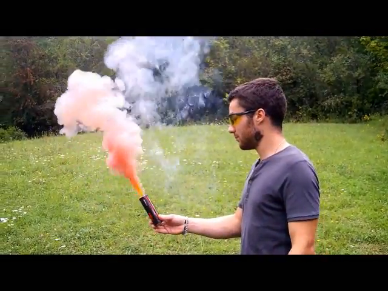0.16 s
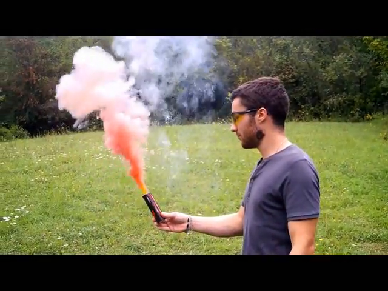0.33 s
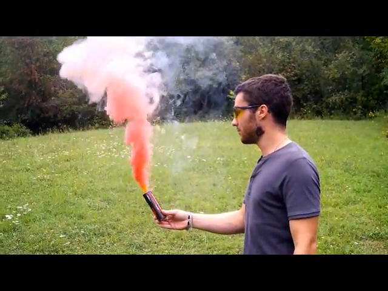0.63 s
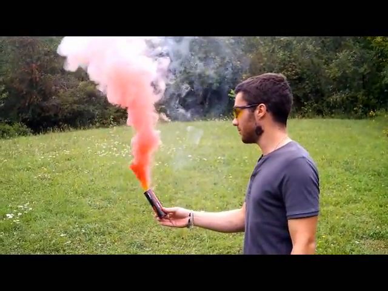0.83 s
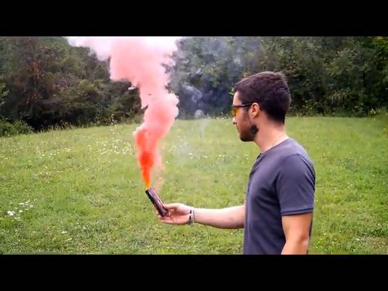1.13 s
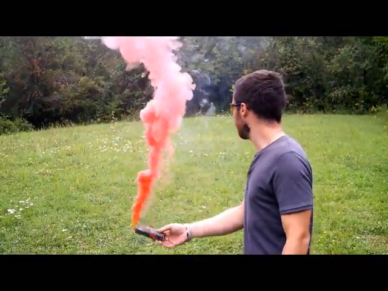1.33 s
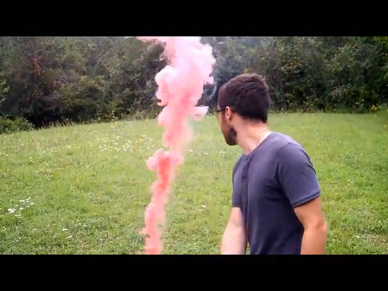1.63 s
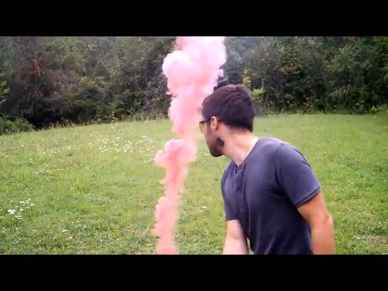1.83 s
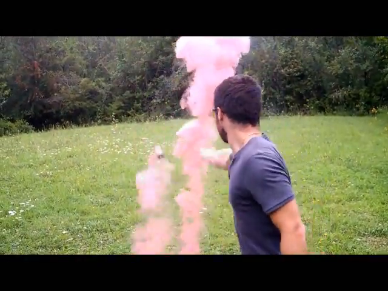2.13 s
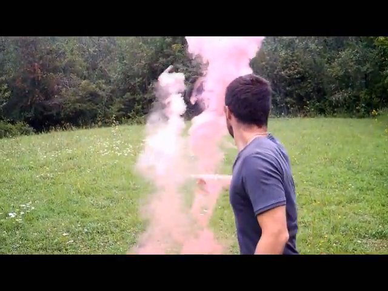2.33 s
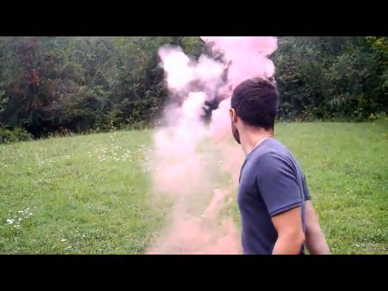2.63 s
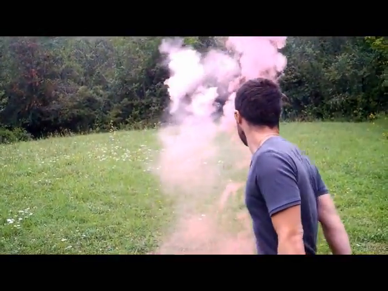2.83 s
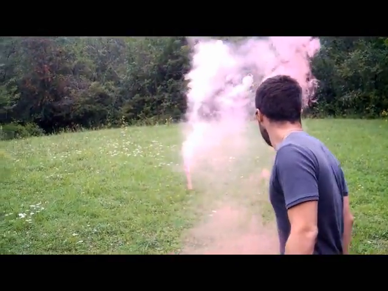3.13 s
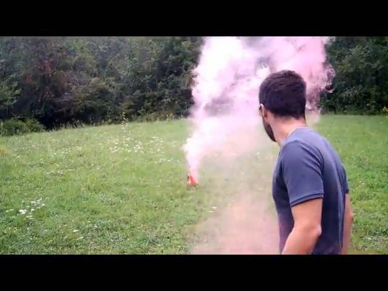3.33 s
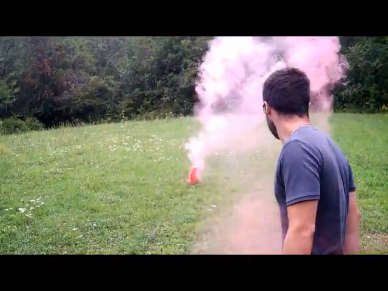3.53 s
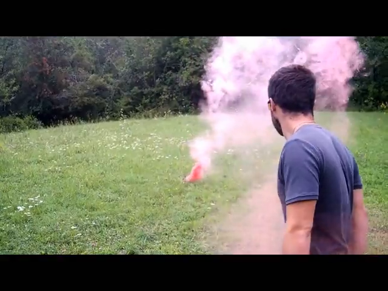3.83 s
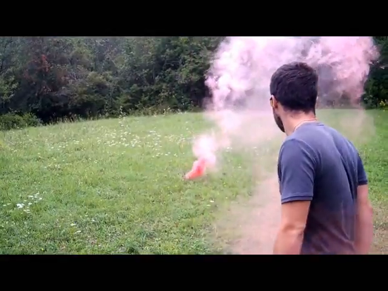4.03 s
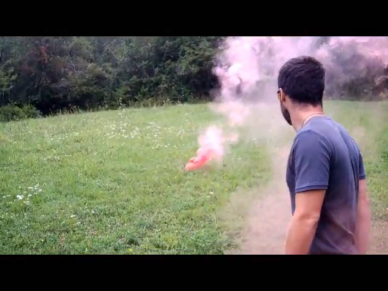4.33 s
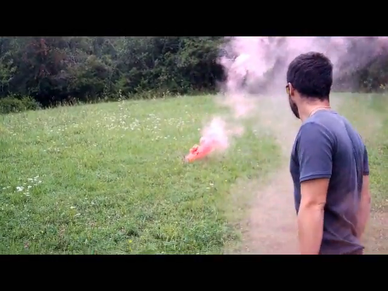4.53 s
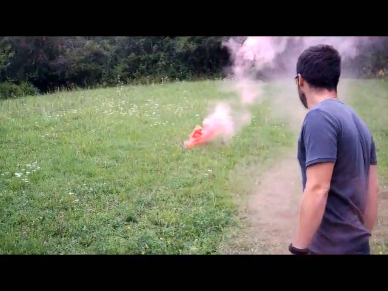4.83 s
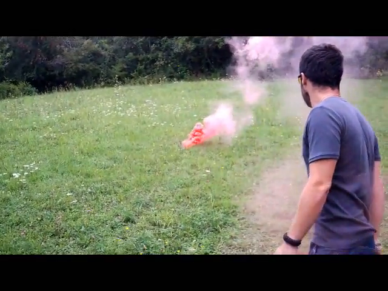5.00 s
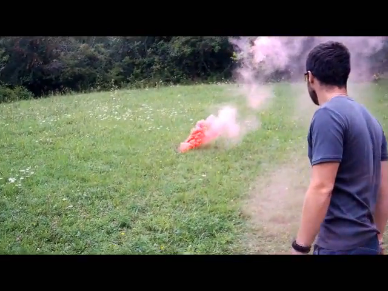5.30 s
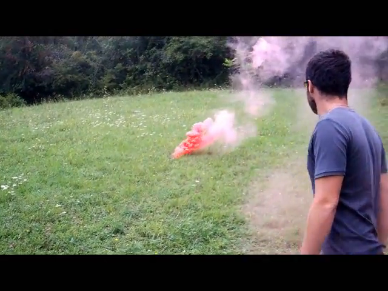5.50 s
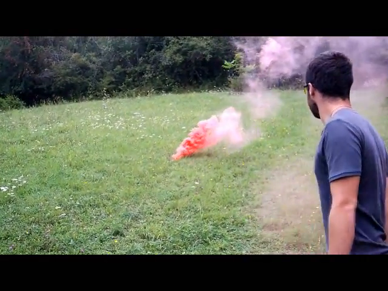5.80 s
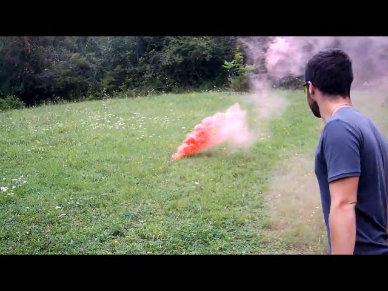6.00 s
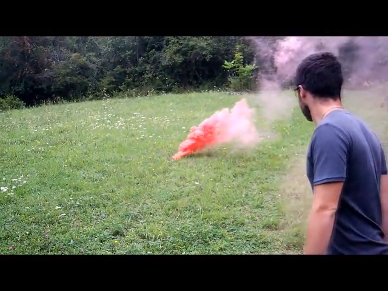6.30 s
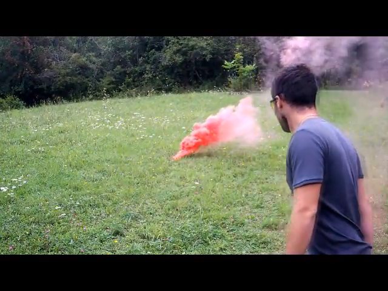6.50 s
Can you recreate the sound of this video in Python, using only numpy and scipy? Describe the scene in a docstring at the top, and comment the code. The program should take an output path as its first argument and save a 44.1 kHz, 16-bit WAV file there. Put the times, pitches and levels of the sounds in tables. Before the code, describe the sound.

A smoke grenade burns with a soft rush over the steady, quiet wash of an open field. Right at the hand-held microphone come irregular, short pops and hollow knocks, like taps on the housing. At 0.9 seconds one very loud, sharp crack clips and jolts the microphone. Smaller knocks cluster around 1.3 seconds, with more at 1.8, 2.1 and 2.6. The rush brightens near 1.9 seconds as the grenade is swung, spits faintly as it is thrown, then recedes. A grainy hiss swells at about 3.3 seconds and more softly at 4.2, among further pops between 3.2 and 4 seconds. Low gusts buffet the microphone from about 3.2 to 5.6 seconds, with a sharp click at 4.8. The hiss rises again from 5.2 to 5.7 seconds with light knocks and ticks. A firmer knock and low bump land at 5.9, leaving the quiet field and a faint hiss.

```python
"""A soft rush over the quiet wash of an open field: a smoke grenade burning, heard from a hand-held camera.
Right at the microphone come irregular pops and sharp cracks, most likely knocks on the camera's housing;
all ring the same few modes, and the hardest one clips. Out in the field a grainy hiss comes
and goes in a few swells. Gusts and the hardest knocks shake the microphone."""
import sys
import numpy as np
from scipy import signal
from scipy.fft import rfft, irfft, next_fast_len
from scipy.io import wavfile
from scipy.ndimage import uniform_filter1d

SR = 44100
rng = np.random.default_rng(int(sys.argv[2]) if len(sys.argv) > 2 else 0)


def put_to_file(sound):
    """Save the sound as 16-bit audio at rate SR, in the file named by the first command-line argument."""
    columns = np.atleast_2d(sound).T  # one column per channel
    safe = np.clip(columns, -1, 1)
    whole_steps = np.round(safe * 32767)
    wavfile.write(sys.argv[1], SR, whole_steps.astype(np.int16))


N = 293392
TIME = np.arange(N) / SR

# knocks on the housing: t/s, relative levels of ring/dB, thump/dB, crack/dB, crack tilt/(dB per octave)
KNOCK_HITS = [(0.672, -36.5, -43, -57.5, -3), (0.9177, -4, -21, -1, -1.5), (1.243, -33.5, -38.5, -50, -5),
              (1.289, -30.5, -31.5, -41, -8), (1.327, -19.5, -34, -28, -6), (1.792, -21, -33, -22.5, 3),
              (1.897, -41, -43, -60, -3), (2.101, -25, -36.5, -41.5, -6.5), (2.299, -31, -40.5, -54, 4),
              (2.592, -18.5, -34, -22.5, -4), (3.21, -33, -41, -52, -6), (3.465, -23, -33, -37, -4),
              (3.585, -23.5, -34, -39, -2.5), (3.754, -32, -45.5, -63, -1), (3.89, -21, -42.5, -24.5, -2.5),
              (4.025, -27.5, -50, -37.5, -13.5), (4.7652, -35, -59, -24.5, 4.5),
              (5.136, -33, -37.5, -49.5, 7.5), (5.229, -28, -36.5, -57.5, 5), (5.319, -27, -37, -42.5, 2.5),
              (5.574, -40.5, -43.5, -49, -5), (5.881, -21.5, -25, -27.5, -7),
              (5.893, -27.5, -42.5, -38.5, -3.5), (5.952, -40.5, -46.5, -58, 6.5)]
# modes of the housing, low to high: f/Hz, level/dB, t60/s
HOUSING_MODES = [(169.04, -2, 0.1526), (179, -29, .06), (363.8, -3, 0.0455), (424.5, 2.5, 0.0327),
                 (534, -4.5, 0.0743), (587.1, 11, 0.01803), (712.65, 1.5, 0.0574), (756.4, -9, 0.0476),
                 (924.6, 1.5, 0.02635), (1103.4, -9, 0.05), (1355.5, -0.5, 0.0287), (1584.7, -2.5, 0.0463),
                 (1791.5, 4.5, 0.0157), (2260, -8, 0.011), (2749, -1.5, 0.0243), (3356, 5, 0.0096),
                 (3842, 4, 0.015), (4224, -4, 0.0132), (4903, -6, 0.0104), (5837, 0.5, 0.0155),
                 (6674, 2, 0.0098), (8564, -11, 0.014)]
# spectrum of surfaces scraping in a knock: f/Hz, level/dB
SCRAPE_SPECTRUM = [(300, -8), (700, -30), (950, -0.5), (1400, -36.5), (1900, 5.5), (2650, 5), (3100, -21.5),
                   (4100, 14.5), (5700, 7), (7000, -8), (9000, -5.5)]
# spectrum of the grenade's hiss and spitting: f/Hz, level/dB
HISS_SPECTRUM = [(1200, -21.5), (2200, -9), (2900, -2), (4200, -2), (6500, 0.5), (8500, 2.5), (9600, -3.5)]


def gain_of(db):
    """Decibels to amplitude."""
    return 10 ** (np.asarray(db) / 20)


def unit_rms(x):
    """Scales to rms 1."""
    return x / np.sqrt(np.mean(x ** 2) + 1e-20)


def unit_hit(x):
    """Scales a hit so that its loudest 5 ms have rms 1."""
    return x / np.sqrt(uniform_filter1d(x ** 2, 220).max() + 1e-20)


def add(mix, s, sound):
    """Mixes a sound in at time s."""
    part = mix[round(s * SR):][:len(sound)]
    part += sound[:len(part)]


def coloured(x, spectrum):
    """Filters x by a curve of (f/Hz, level/dB) points, to rms 1."""
    hz, db = np.transpose(spectrum)
    size = next_fast_len(2 * len(x), True)
    bins = np.fft.rfftfreq(size, 1 / SR)
    gain = gain_of(np.interp(np.log(bins + 1), np.log(hz + 1), db))
    return unit_rms(irfft(rfft(x, size) * gain, size)[:len(x)])


def noise(spectrum, size=N):
    """Noise of rms 1 with a spectrum of (f/Hz, level/dB) points."""
    return coloured(rng.standard_normal(size), spectrum)


def wander(rate_hz):
    """Slow random drift of rms 1, up to about the given rate."""
    bins = np.fft.rfftfreq(N, 1 / SR)
    return unit_rms(irfft(rfft(rng.standard_normal(N)) * np.exp(-(bins / rate_hz) ** 2), N))


def swell(s, rise, fall, db, shape=1.084):
    """A gain that peaks at time s and dies away; shape 1 is pointed, 2 round."""
    away = np.maximum((s - TIME) / rise, (TIME - s) / fall)
    return gain_of(db) * np.exp(-np.minimum(away, 20) ** shape)


def swelling(rows):
    """Overlapping swells add in power."""
    return np.sqrt(sum(swell(*row) ** 2 for row in rows))


def ringing(modes, t, detune=0.0322, damping_spread=0.046):
    """Dying sines; the grip shifts and damps each mode a little differently from blow to blow."""
    out = np.zeros(len(t))
    for hz, db, t60 in modes:
        shift, damping = rng.uniform(-1.008, 1, 2)
        decay = gain_of(db - 60 * t / t60 * np.exp(damping_spread * damping))
        out += decay * np.sin(2 * np.pi * hz * (1 + detune * shift) * t)
    return out


def chatter(t, length_s):
    """Surfaces rattle against each other for a few milliseconds, then hold."""
    return rng.standard_normal(len(t)) * (1 - np.exp(-t / 0.000126)) * np.exp(-(t / length_s) ** 2)


def stiff_shell(x, hz):
    """A stiff shell hardly follows a push slower than its modes: a high-pass, scaled to a unit hit."""
    return unit_hit(signal.sosfilt(signal.butter(2, hz, "highpass", fs=SR, output="sos"), x))


def field(wash_db=-49, insects_db=-65):
    """The steady wash of open ground, with a thin high band like far insects."""
    # outdoor background: f/Hz, level/dB
    wash_spectrum = [(44, -29.5), (75, 1.5), (108, -1.5), (135, 0), (218, -7.5), (450, -9), (760, -12.5),
                     (1070, -10.5), (1570, -17.5), (2080, -18.5), (2550, -20), (2870, -20), (5150, -22.5),
                     (9240, -23), (12000, -54), (20300, -120)]
    wash = noise(wash_spectrum) * gain_of(wash_db + 0.31 * wander(7.1))
    insects = noise([(7600, -33), (8400, -5), (8680, -2.0), (9000, -2.5), (9600, -15)])
    return wash + gain_of(insects_db) * insects


def wind(breeze_db=-46, lumpy_db=1.5, jolt_db=-27, hardest_thump_db=-21):
    """Lumpy low buffeting at the microphone: a breeze, gusts, and a jolt from each hard knock."""
    # rumble at the microphone: f/Hz, level/dB
    rumble_spectrum = [(8, -24), (16, 4.5), (36, 1), (55, -5.5), (85, -16), (125, -31.5), (250, -35.5),
                       (600, -88.5)]
    # gusts: peak t/s, half length/s, level/dB
    gust_peaks = [(3.243, 0.131, -40.5), (3.652, 0.095, -35.5), (3.889, 0.063, -31), (4.508, 0.101, -32.5),
                  (4.67, .05, -38), (4.87, 0.073, -34), (5.566, 0.057, -36)]
    gusts = swelling([(s, half, half, db) for s, half, db in gust_peaks])
    jolts = swelling([(s, 0.0098, 0.075, jolt_db + 1.7 * (thump_db - hardest_thump_db))
                      for s, _, thump_db, *_ in KNOCK_HITS])
    strength = np.sqrt(gain_of(breeze_db) ** 2 + gusts ** 2 + jolts ** 2)
    return noise(rumble_spectrum) * strength * gain_of(lumpy_db * wander(5.07))


def burn(flutter_db=1.47, jet_flutter_db=0.27, spits_per_s=45):
    """Smoke rushes softly from the canister, brighter as it is swung, spitting as it is thrown."""
    # rush of the smoke: f/Hz, level/dB
    rush_spectrum = [(200, -11.5), (500, 1), (1150, 3), (1600, -3), (2200, -1), (3200, -4.5), (4200, -8.5),
                     (7000, -35.5)]
    # the rush at the microphone, fainter once thrown: t/s, level/dB
    rush_curve = [(0, -55), (1.6, -56), (2.0, -51.5), (2.7, -60.5), (6.65, -69.5)]
    # brighter jet of the swing: f/Hz, level/dB
    jet_spectrum = [(1500, -18), (2400, -4), (3100, 1.5), (3500, -2), (4300, -15), (7000, -35)]
    swing = swell(1.88, rise=0.24, fall=0.17, db=-54)
    throw = swell(2.5, rise=0.43, fall=0.01, db=-59)
    rush_db = np.interp(TIME, *np.transpose(rush_curve))
    rush = noise(rush_spectrum) * gain_of(rush_db + flutter_db * wander(8.1))
    jet = noise(jet_spectrum) * swing * gain_of(jet_flutter_db * wander(8))
    sparks = rng.uniform(-1, 1, N) * (rng.random(N) < spits_per_s / SR)
    spit = chatter(np.arange(SR // 100) / SR, 0.0028)
    sputter = coloured(signal.fftconvolve(sparks, spit)[:N], HISS_SPECTRUM) * throw
    return rush + jet + sputter


def hiss(flutter_db=1.3, grains_per_s=1200, grain_share=0.787):
    """Smooth hiss mixed with fine grains, swelling together."""
    # swells of the hiss: peak t/s, rise/s, fall/s, level/dB
    hiss_swells = [(2.38, 0.31, 0.085, -58), (3.08, 0.17, .1, -53.5), (3.27, 0.104, 0.101, -46),
                   (3.322, 0.0128, 0.0234, -39.5), (4.15, 0.06, 0.283, -49), (5.335, .085, .18, -42),
                   (5.67, .1, .045, -40.2), (5.96, 0.021, 0.052, -55), (6.65, 0.065, .05, -52)]
    grains = rng.standard_normal(N) * (rng.random(N) < grains_per_s / SR)
    fizz = coloured(rng.standard_normal(N) + grain_share * unit_rms(grains), HISS_SPECTRUM)
    return fizz * swelling(hiss_swells) * gain_of(flutter_db * wander(50))


def ticks():
    """Tiny bright contacts with no ring."""
    # dry ticks: t/s, level/dB
    tick_hits = [(0.9128, -20.5), (1.284, -45), (2.62, -50.5), (3.3035, -31.5), (5.6678, -43.5),
                 (5.6952, -32), (5.937, -44.5)]
    out, t = np.zeros(N), np.arange(SR // 40) / SR
    for s, db in tick_hits:
        tick = coloured(chatter(t, 0.00292), [(1200, -18), (3000, -6), (9000, -4.5)])
        add(out, s, gain_of(db) * unit_hit(tick))
    return out


def grip_bumps(rise_s=0.0071, t60=0.179):
    """Handling noise: as the grip shifts, slow pushes stir one low tone each."""
    # soft bumps: t/s, f/Hz, level/dB
    bumps = [(1.294, 411.5, -39), (3.318, 136.3, -43.5), (4.475, 86.1, -35.5), (5.725, 156.5, -33),
             (5.884, 76, -35)]
    out, t = np.zeros(N), np.arange(SR // 4) / SR
    push = 1 - np.exp(-(t / rise_s) ** 2)
    for s, hz, db in bumps:
        add(out, s, gain_of(db) * unit_hit(ringing([(hz, 0, t60)], t) * push))
    return out


def shell_flex(rattle_s=0.00767, settle_db=-23, settle_t60=0.054):
    """The two hardest blows flex the whole shell, rattle on for a dozen milliseconds, then settle."""
    # blows that bend the shell: t/s, hollow modes/dB, upper mode/dB, rattle/dB
    blows = [(0.918, -7, -7, -7.5), (5.8815, -21, -47, -44)]
    out, t = np.zeros(N), np.arange(SR // 8) / SR
    hollow, upper = HOUSING_MODES[2:4], HOUSING_MODES[8:9]
    for s, hollow_db, upper_db, rattle_db in blows:
        flex = gain_of(hollow_db) * stiff_shell(ringing(hollow, t), hz=351)
        flex += gain_of(upper_db) * unit_hit(ringing(upper, t))
        rattle = unit_hit(coloured(chatter(t, rattle_s), SCRAPE_SPECTRUM))
        settle = gain_of(settle_db - 60 * t / settle_t60) * noise(SCRAPE_SPECTRUM, len(t))
        add(out, s, flex + gain_of(rattle_db) * (rattle + settle))
    return out


def knocks(grit=0.459, tail_db=-23, tail_t60=0.148):
    """Blows right by the microphone: the push rings the low modes, the contact's chatter the high ones."""
    out, t = np.zeros(N), np.arange(SR // 4) / SR
    thump, hollow, ring = HOUSING_MODES[:2], HOUSING_MODES[2:4], HOUSING_MODES[4:10]
    clack, crack = HOUSING_MODES[10:14], HOUSING_MODES[14:]
    for s, ring_db, thump_db, crack_db, tilt_db in KNOCK_HITS:
        dullness = np.clip((ring_db - crack_db) / 20, 0, 1)  # a dull knock is a slower push
        push = 1 - np.exp(-(t / (0.000705 + 0.000287 * dullness)) ** 2)
        low = gain_of(thump_db - 1) * stiff_shell(ringing(thump, t), hz=234)
        low += gain_of(ring_db - 12) * stiff_shell(ringing(hollow, t) * push, hz=313)
        low += gain_of(ring_db - 1) * stiff_shell(ringing(ring, t) * push, hz=276)
        # the clack follows ring and crack; towards a stiff edge a blow thumps less and clacks more
        clack_db = ring_db - 24 + 0.77 * (crack_db - ring_db) + 0.82 * (ring_db - thump_db)
        contact = chatter(t, 0.00252)
        high = gain_of(clack_db) * unit_hit(signal.fftconvolve(contact, ringing(clack, t))[:len(t)])
        bright = unit_hit(signal.fftconvolve(contact, ringing(crack, t))[:len(t)])
        bright += grit * unit_hit(coloured(chatter(t, 0.00504), SCRAPE_SPECTRUM))
        tilted = coloured(bright, [(1500, 0), (12000, 3 * tilt_db)])  # over three octaves
        high += gain_of(crack_db - 2) * unit_hit(tilted)
        # a faint dull tail comes back from the ground and things close by
        tail = noise([(250, 7.0), (500, -18.5), (1000, -6.5), (2000, -16), (9000, -42.5)], len(t))
        tail *= gain_of(ring_db + tail_db - 60 * t / tail_t60) * push
        add(out, s + 0.000185, low + tail)
        add(out, s, high)
    return out


def scene():
    """Handling noise, grenade and open air at the one microphone."""
    handling = knocks() + shell_flex() + grip_bumps() + ticks()
    return (handling + hiss() + burn() + field() + wind())[None]


def record(dry, ceiling=0.891, cutoff_hz=9650):
    """The loudest crack clips near full scale; a steep low-pass cuts the top treble."""
    lowpass = signal.firwin(511, cutoff_hz, window=("kaiser", 9), fs=SR)
    return signal.oaconvolve(np.clip(dry, -ceiling, ceiling), lowpass[None], "same")


dry = scene()
out = record(dry)
put_to_file(out)
```